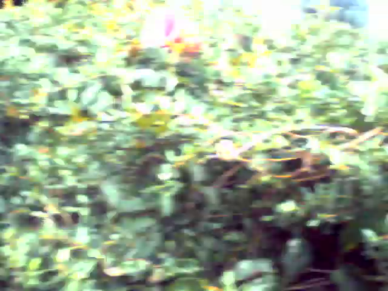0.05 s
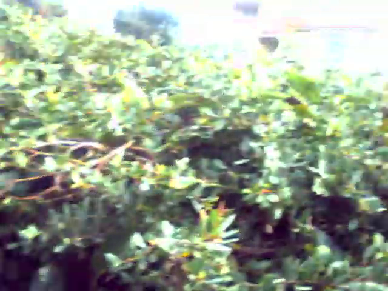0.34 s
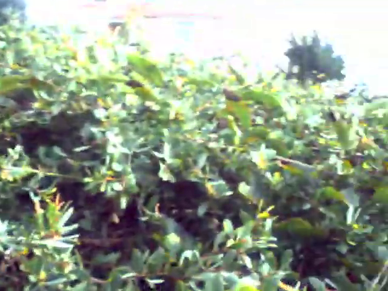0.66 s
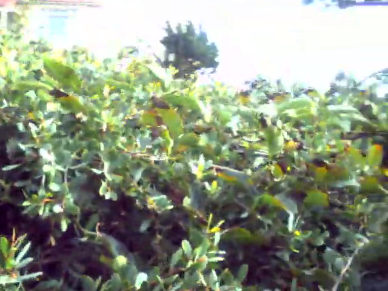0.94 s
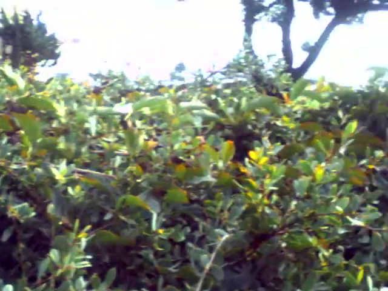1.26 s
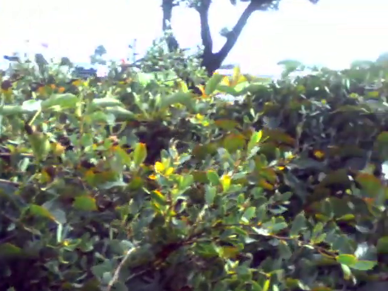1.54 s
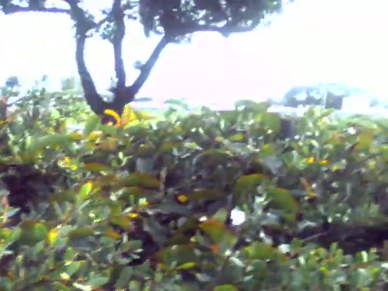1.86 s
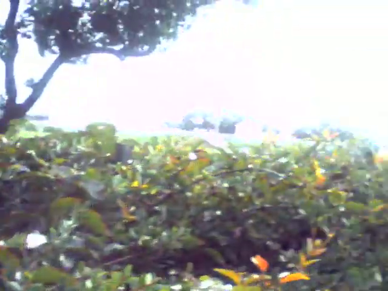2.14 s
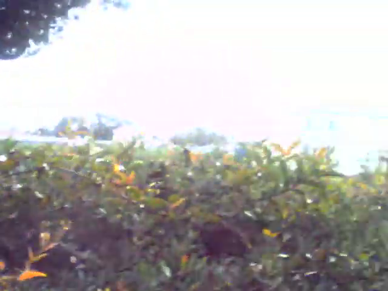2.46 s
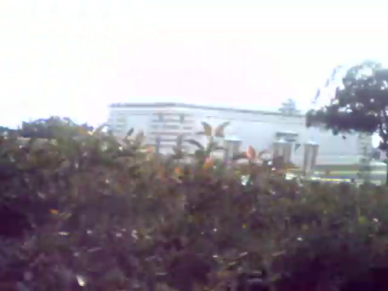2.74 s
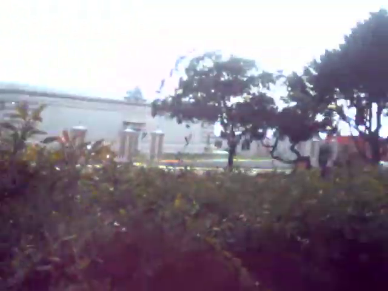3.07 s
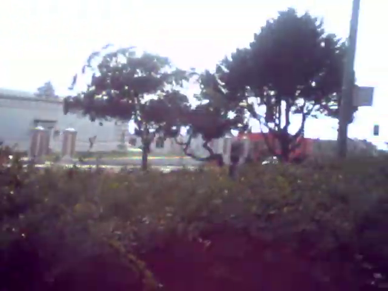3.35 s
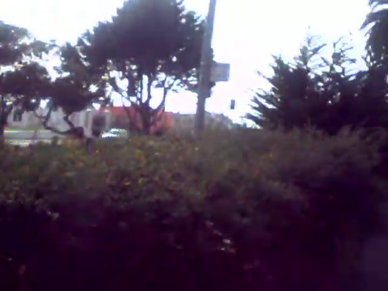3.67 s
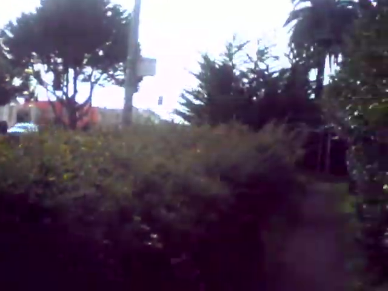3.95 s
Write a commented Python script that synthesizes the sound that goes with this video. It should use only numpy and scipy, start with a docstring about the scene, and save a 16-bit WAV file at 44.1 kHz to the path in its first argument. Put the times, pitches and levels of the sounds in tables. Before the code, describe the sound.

Steady far-off traffic, tyres and engines over a deep rumble, with one tiny click.

```python
"""Distant road traffic over a hedge: from the start, tyres roar near 1 kHz above an engine drone and a
deep rumble. From 0.7 to 1.5 s a hand faintly rubs and bumps the small, dull-sounding camera, while
the drone begins a slow sink in pitch. One tiny sharp click comes at 2.5 s, then a light tick of the
case. Just after 3 s the drone is at its lowest and narrowest; it swells and eases under the tyres."""
import sys
import numpy as np
from scipy.fft import rfft, irfft, next_fast_len
from scipy.io import wavfile
from scipy.ndimage import map_coordinates

SR = 44100
rng = np.random.default_rng(int(sys.argv[2]) if len(sys.argv) > 2 else 0)


def log_audio(samples):
    """Write samples as a 16-bit WAV file to the path given in sys.argv[1]."""
    # one column per channel
    frames = np.atleast_2d(samples).T
    # limit to full scale, then quantise
    limited = np.clip(frames, -1, 1)
    pcm = np.round(limited * 32767).astype(np.int16)
    wavfile.write(sys.argv[1], SR, pcm)


N = 176400


def amp(db):
    """Decibels to gain."""
    return 10 ** (np.asarray(db) / 20)


def unit(x):
    """Scale to rms 1."""
    return x / np.sqrt(np.mean(x ** 2) + 1e-20)


def curves(rows):
    """One value per sample for each column after the time."""
    times, *columns = np.transpose(rows)
    return [np.interp(np.arange(N) / SR, times, column) for column in columns]


def wobble(rate):
    """A smooth random curve, rate knots a second."""
    return map_coordinates(rng.standard_normal(4096), [np.arange(N) * rate / SR], mode="wrap")


def filtered(x, response):
    """Equalise x with a gain given as a function of frequency."""
    size = next_fast_len(N + 8192)
    return irfft(rfft(x, size) * response(np.fft.rfftfreq(size, 1 / SR)), size)[:N]


def noise(spectrum):
    """Noise of rms 1 coloured by points of f/Hz, level/dB."""
    f, db = np.transpose(spectrum)
    white = rng.standard_normal(N)
    return unit(filtered(white, lambda hz: amp(np.interp(np.log(hz + 1), np.log(f), db))))


def hand_rubs():
    """Skin drags over the camera case in grainy strokes."""
    # strokes: start t/s, length/s, relative level/dB
    rubs = [(0.722, .11, 2), (0.821, .39, -0.5), (1.185, 0.095, 1), (1.309, 0.052, 4.5), (1.345, .17, 1)]
    # friction colour: f/Hz, level/dB
    rub_spectrum = [(150, 0), (400, 11), (800, 2.5), (1500, 9), (2300, -1.5), (3000, 2.5), (3800, -4.5),
                    (4400, -4), (4900, -8.5), (6000, -10)]
    t = np.arange(N) / SR
    fade_s = .014
    strokes = sum(amp(db) * np.clip(np.minimum(t - start, start + length - t) / fade_s, 0, 1)
                  for start, length, db in rubs)
    friction = noise(rub_spectrum)
    grain = amp(3 * wobble(rate=170))
    return amp(-45.5) * strokes * unit(friction * grain)


def hand_bumps():
    """Soft knocks of the hand ring the case briefly over a dull thud."""
    # knocks: t/s, level/dB, thud level relative to the knock/dB
    bumps = [(1.2084, -10.5, -6), (1.2156, -22, 9.5), (1.3273, -8, -5.5), (1.3334, -19, 9)]
    # case modes: f/Hz, relative level/dB, t60/s
    case_modes = [(950, 1, 0.011), (1270, -6.5, 0.011), (3060, -25, 0.0047), (4300, -25, .005)]
    thud_hz, thud_t60_s, attack_s = 284, 0.016, 0.00032
    out = np.zeros(N)
    for start, db, thud_db in bumps:
        age = np.maximum(np.arange(N) / SR - start, 0)
        modes = [*case_modes, (thud_hz, thud_db, thud_t60_s)]
        ring = sum(amp(level - 60 * age / t60) * np.sin(2 * np.pi * hz * age) for hz, level, t60 in modes)
        attack = 1 - np.exp(-age / attack_s)
        out -= amp(db) * attack * ring
    return out


def case_tick(at_s=2.755, hz=5450, half_length_s=.0004):
    """The handled case gives one light, high tick."""
    t = np.arange(N) / SR
    envelope = np.exp(-((t - at_s) / half_length_s) ** 2)
    return amp(-37.5) * envelope * np.sin(2 * np.pi * hz * t)


def click(at_s=2.5146, decay_s=0.000158):
    """One abrupt step that relaxes at once: a tiny bright click."""
    age = np.arange(N) / SR - at_s
    return amp(-15) / 2 * -np.sign(age) * np.exp(-np.abs(age) / decay_s)


def rumble():
    """A deep, slowly heaving bed under the traffic."""
    # swells: t/s, relative level/dB
    rumble_level = [(0, -39.5), (0.7, -41), (1.3, -41.5), (1.7, -39.5), (2.2, -37.5), (2.6, -41),
                    (3.1, -42.5), (3.5, -40.4), (4, -37)]
    # low-end colour: f/Hz, level/dB
    rumble_spectrum = [(12, -16), (30, -15.5), (42, -4.5), (54, 2), (76, -1.5), (105, 1.5), (140, -7),
                       (200, -11), (400, -43.5)]
    level_db, = curves(rumble_level)
    return amp(level_db - 1.48) * noise(rumble_spectrum)


def drone_band(width_hz, steepness=1.14):
    """Bell-shaped response around 0 Hz that sets how far the drone's tone is blurred."""
    hz = np.fft.fftfreq(N, 1 / SR)
    bell = (1 + (2 * hz / width_hz) ** 2) ** (-steepness / 2)
    shape = bell / (1 + (hz / 190) ** 4)  # trim the far skirts
    return shape / np.linalg.norm(shape)


def engines():
    """Many engines blur into one drone that sinks and narrows."""
    # drone swells: t/s, relative level/dB
    engine_level = [(0, -36.5), (0.25, -38), (0.6, -31.5), (1, -31.0), (1.45, -32), (1.8, -31.5),
                    (2.3, -31.5), (2.7, -31.5), (2.98, -32.7), (3.15, -30), (3.4, -29), (3.7, -31.5),
                    (4, -36)]
    # drone centre: t/s, f/Hz
    engine_pitch = [(0, 255), (0.698, 278), (1.3, 268), (2.2, 242), (3.199, 222), (4, 232)]
    # drone spread: t/s, nominal width/Hz
    engine_width = [(0, 115), (1.1, 134.4), (2.6, 114.6), (3.3, 45.1), (4, 80)]
    level_db, = curves(engine_level)
    pitch, = curves(engine_pitch)
    width, = curves(engine_width)
    white = np.fft.fft(rng.standard_normal(N) + 1j * rng.standard_normal(N))
    narrow = np.fft.ifft(white * drone_band(width.min()))
    wide = np.fft.ifft(white * drone_band(width.max()))
    crossfade = (width - width.min()) / (np.ptp(width) + 1e-9)
    blur = (1 - crossfade) * narrow + crossfade * wide
    tone = np.exp(2j * np.pi * np.cumsum(pitch) / SR)
    return amp(level_db - 0.26) * unit((blur * tone).real)


def tyres():
    """Tyres roar on the far road, with a lower body and a faint even hiss."""
    # traffic flow: t/s, relative roar level/dB, relative body level/dB
    traffic = [(0, -27.5, -41), (0.2, -30, -36), (0.45, -28, -35.0), (0.8, -29, -32.5), (1.1, -30, -34.5),
               (1.5, -29.5, -36), (1.65, -27, -36.5), (1.85, -26.5, -31.5), (2.15, -28, -31.5),
               (2.42, -27, -29.5), (2.65, -28, -32), (2.9, -27.9, -32.5), (3.15, -29.0, -33.0),
               (3.58, -29, -32.5), (3.8, -29.5, -34), (4, -29, -33)]
    # tyre roar colour: f/Hz, level/dB
    roar_spectrum = [(350, -30), (700, -12.5), (830, -6.5), (910, -1.1), (1010, -0.7), (1130, -5),
                     (1300, -10.5), (1480, -18), (1700, -20), (2000, -27), (2500, -35), (4000, -60)]
    # lower road roar colour: f/Hz, level/dB
    body_spectrum = [(150, -17), (330, -4.5), (480, -5), (600, -2), (720, 1), (850, -4.5), (1100, -17),
                     (2000, -52)]
    # hiss colour: f/Hz, level/dB
    hiss_spectrum = [(1500, -14.5), (2400, -10), (2850, -0.5), (3200, 0.5), (3500, -3), (3850, -11),
                     (4300, -9), (4800, -9), (6000, -12.5)]
    roar_db, body_db = curves(traffic)
    roar = amp(roar_db + 0.38) * noise(roar_spectrum)
    flutter = amp(0.62 * wobble(rate=22))  # moving air makes the far sound waver
    body = amp(body_db + 0.34) * noise(body_spectrum)
    hiss = amp(-50) * noise(hiss_spectrum)
    return roar * flutter + body + hiss


def scene():
    """Far traffic and close handling, in mono."""
    return (tyres() + engines() + rumble() + hand_rubs() + hand_bumps() + case_tick())[None]


def record(dry):
    """The microphone dulls the scene; the click joins after it and stays bright."""
    # microphone treble roll-off: f/Hz, level/dB
    mic_rolloff = [(4850, 0), (5100, -6.5), (5500, -14.5), (6000, -25), (6200, -42.5), (6400, -74.5)]
    band_limit_hz = 15800
    dull = filtered(dry[0], lambda hz: amp(np.interp(hz, *np.transpose(mic_rolloff))))
    return filtered(dull + click(), lambda hz: np.clip((band_limit_hz - hz) / 600 + .5, 0, 1))[None]


dry = scene()
out = record(dry)
log_audio(out)
```